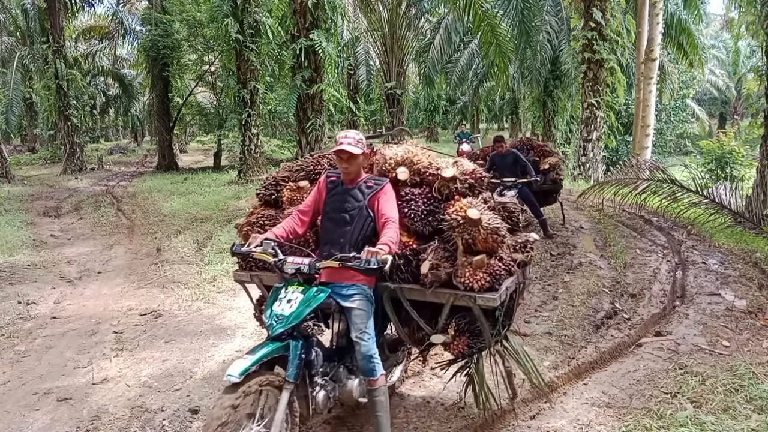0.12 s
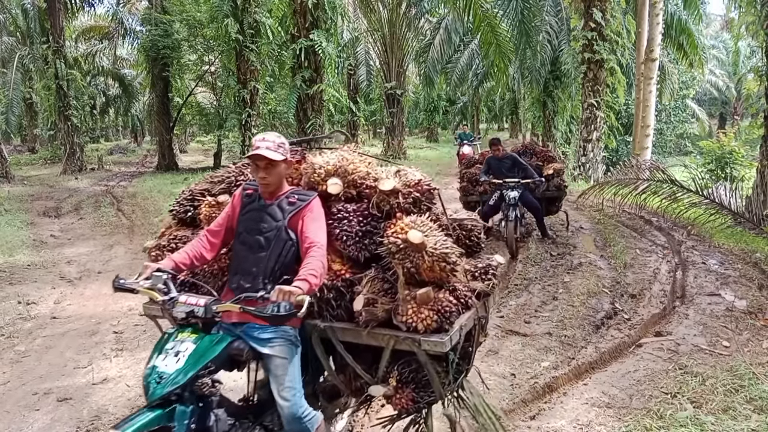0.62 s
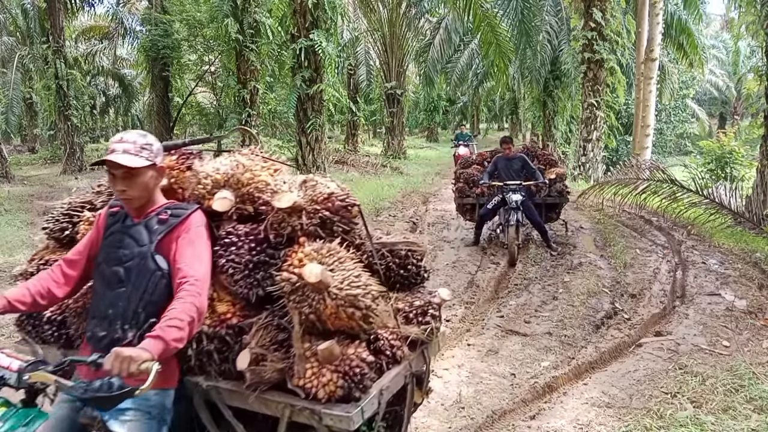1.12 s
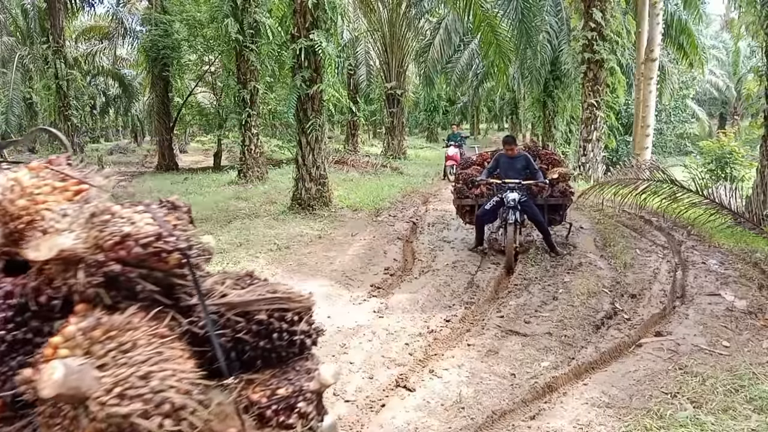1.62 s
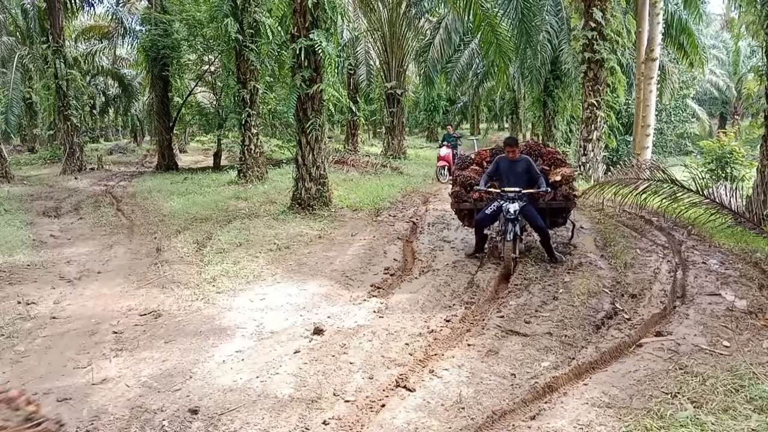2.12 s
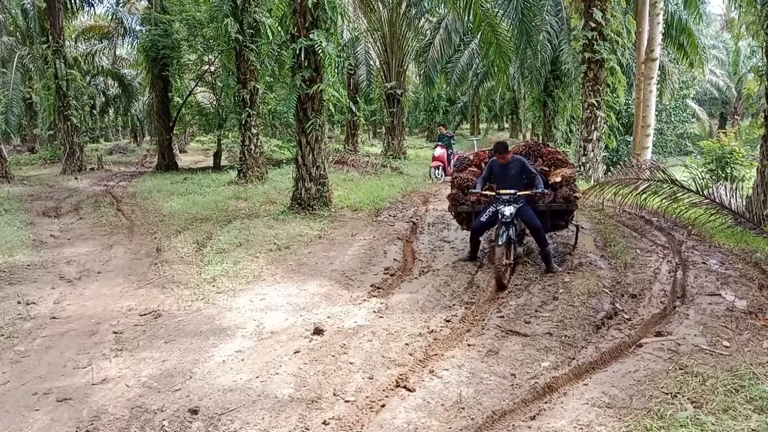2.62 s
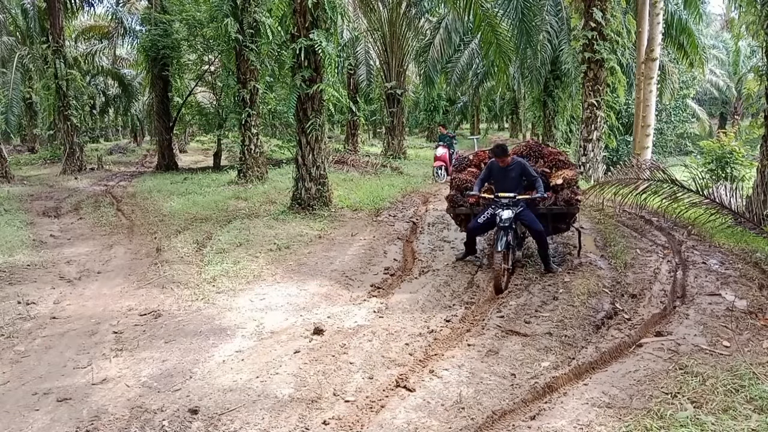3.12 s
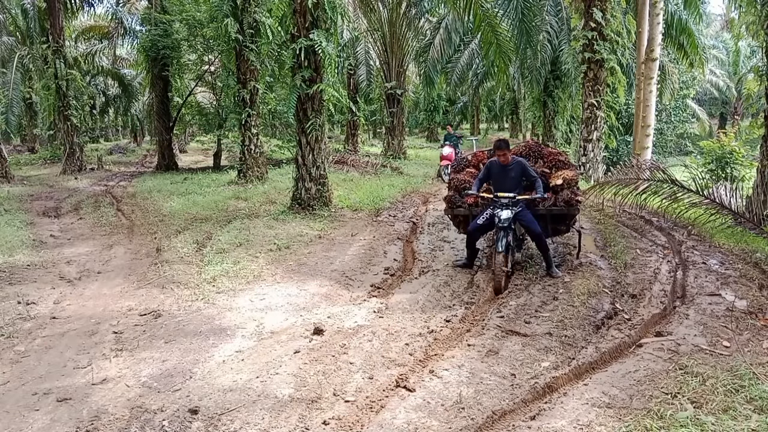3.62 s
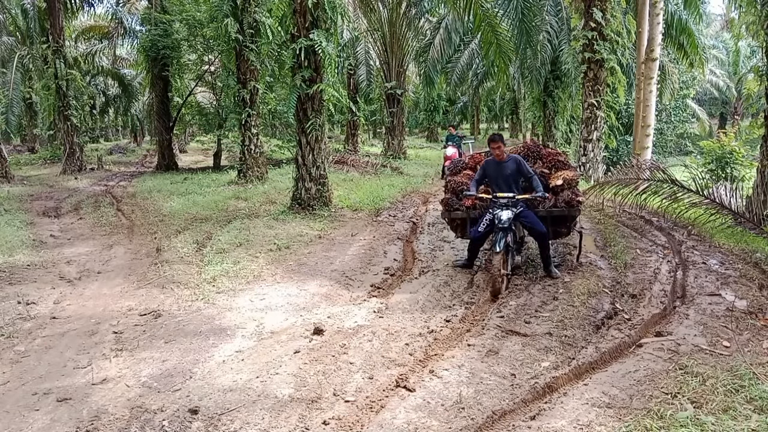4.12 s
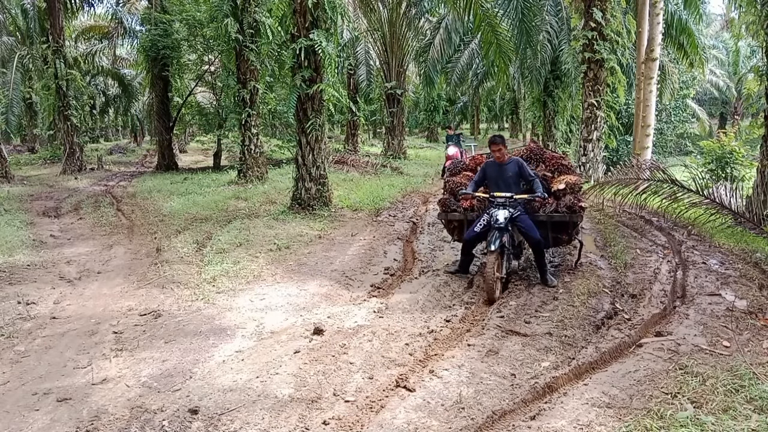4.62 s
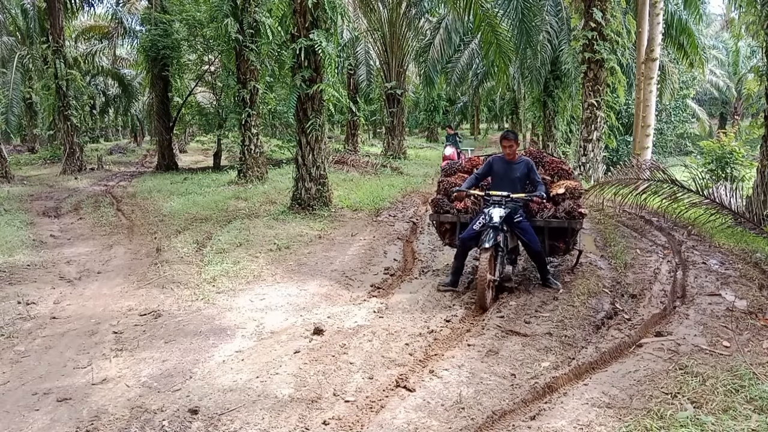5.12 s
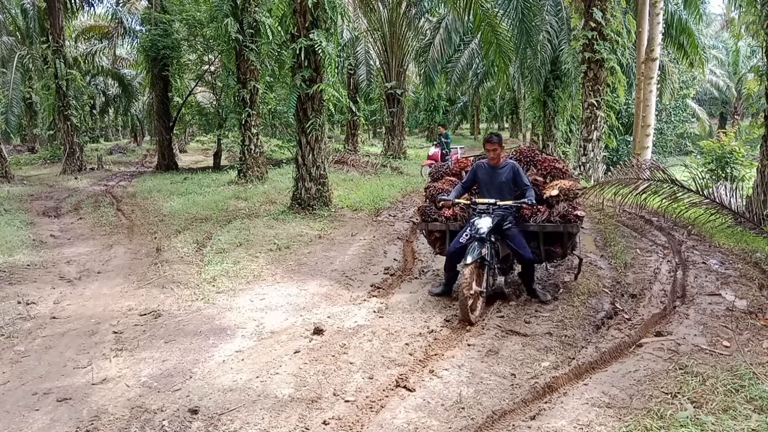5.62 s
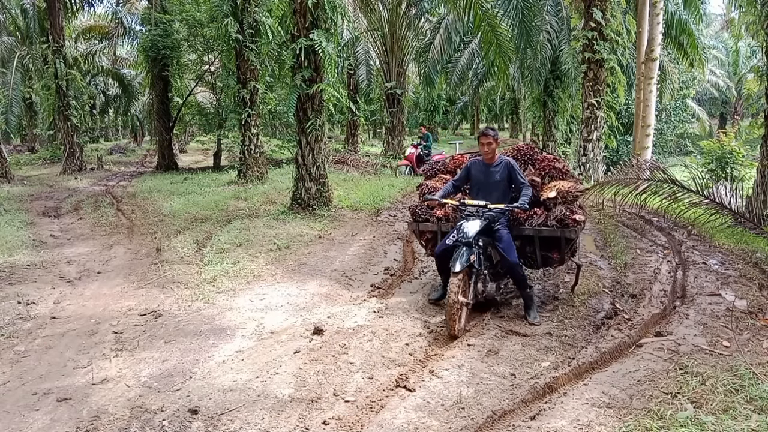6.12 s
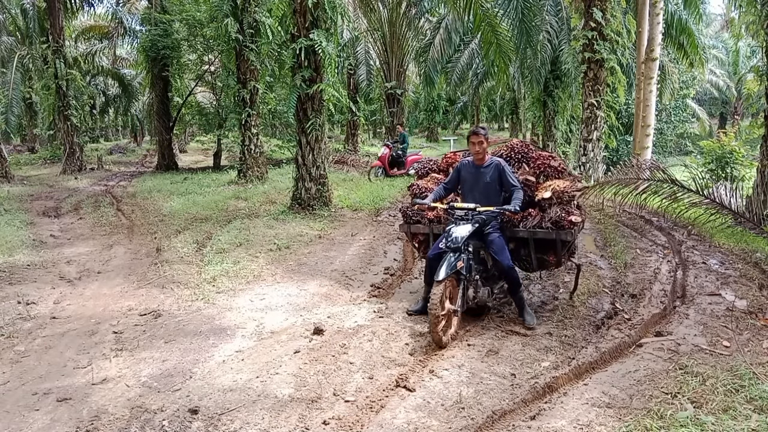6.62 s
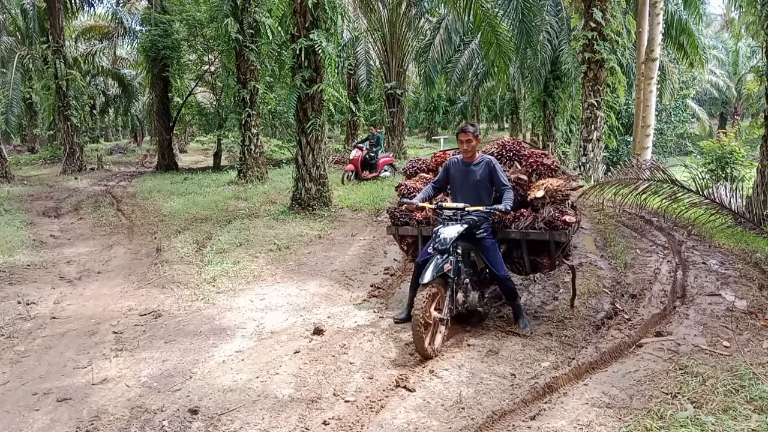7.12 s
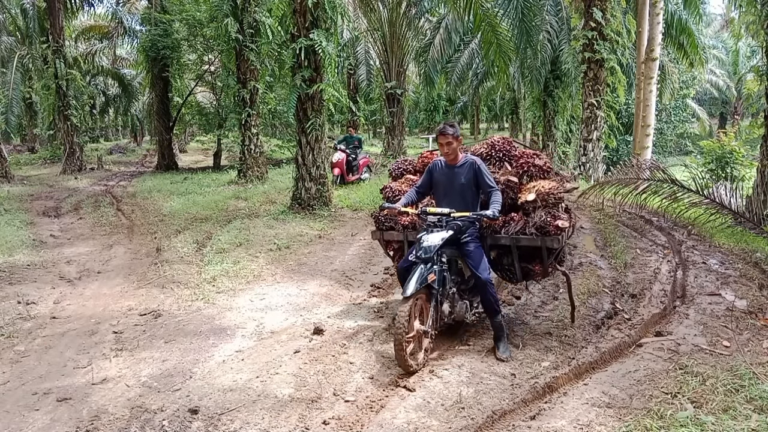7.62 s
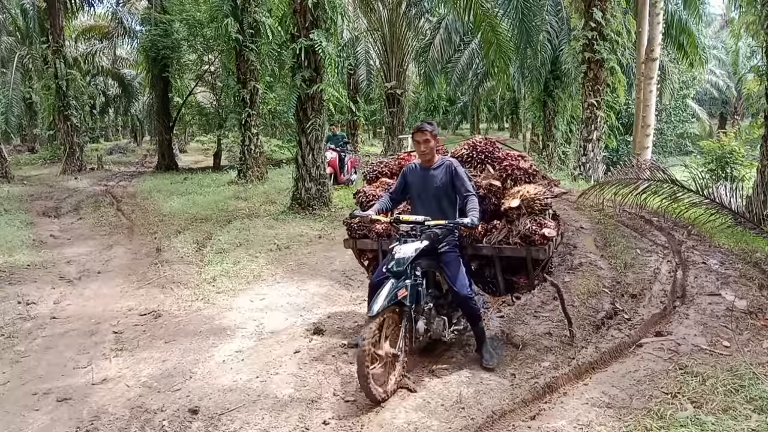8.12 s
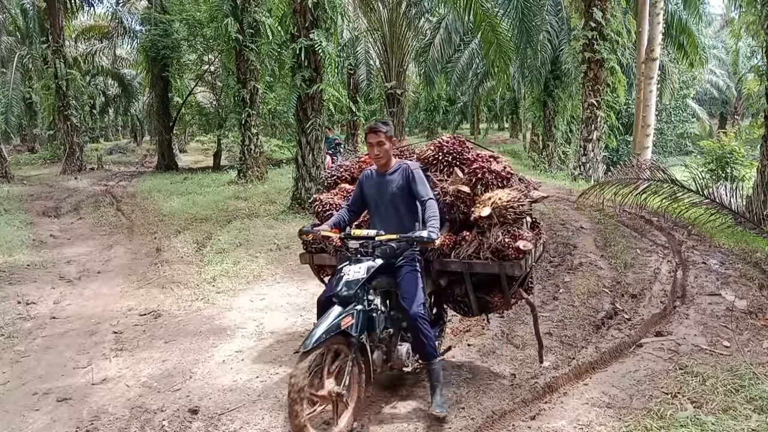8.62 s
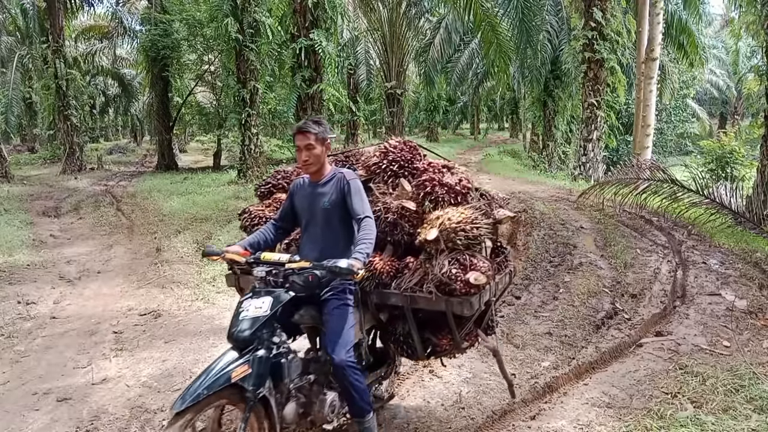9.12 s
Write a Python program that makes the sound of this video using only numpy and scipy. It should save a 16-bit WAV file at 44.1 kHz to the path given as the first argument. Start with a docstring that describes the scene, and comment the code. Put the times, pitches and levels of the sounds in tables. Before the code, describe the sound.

Two small single-cylinder motorcycles labour slowly past with loaded carts, exhausts thumping low and fast, with tinny rattle, spitting gas and scattered ticks.

```python
"""Two small single-cylinder motorcycles haul loaded carts slowly past a close microphone among palm trunks.
The first engine booms and spits from the start; from about 5.6 s the second, barking sharply, leads.
Each firing rings the exhaust pipe low, barks, and shakes tin modes; the first also spits leaking gas.
The first engine's spit fades after 7.5 s. Ticks come throughout, over a faint rumble; a limiter squeezes all."""
import sys
import numpy as np
from scipy import signal
from scipy.fft import rfft, irfft
from scipy.io import wavfile
from scipy.ndimage import uniform_filter1d, minimum_filter1d, map_coordinates

SR = 44100
rng = np.random.default_rng(int(sys.argv[2]) if len(sys.argv) > 2 else 0)


def rack_gain(trim_db):
    """Turn a fader trim in dB into the linear factor to multiply a signal by."""
    fader = np.asarray(trim_db, float)
    return 10 ** (fader / 20)


def wrap_up_sound(samples):
    """Save the sound to the file named by the first command line argument, as 16-bit audio."""
    columns = np.atleast_2d(samples).T
    # keep every value between -1 and 1, then stretch to whole-number steps
    tamed = np.clip(columns, -1, 1)
    steps = np.round(tamed * 32767).astype(np.int16)
    wavfile.write(sys.argv[1], SR, steps)


N = 408366


def rms_one(x):
    """Scale to rms 1."""
    return x / np.sqrt(np.mean(x ** 2) + 1e-20)


def in_time(rows):
    """Columns of a table, interpolated to one value per sample."""
    t_s, *columns = np.transpose(rows)
    return [np.interp(np.arange(N) / SR, t_s, column) for column in columns]


def evened(x, window_s):
    """Divide out the slow level."""
    return x / np.sqrt(uniform_filter1d(x ** 2, size=int(window_s * SR)) + 1e-12)


def coloured(x, spectrum):
    """Shape by a spectrum of (f/Hz, level/dB), interpolated over log frequency."""
    f_hz, level_db = np.transpose(spectrum)
    grid_hz = np.arange(N // 2 + 1) * SR / N + 1
    return irfft(rfft(x) * rack_gain(np.interp(np.log(grid_hz), np.log(f_hz), level_db)), N)


def drift(rate_hz):
    """Slow random walk between normal draws of spread 1, rate_hz draws per second."""
    draws = rng.standard_normal(size=400)
    return map_coordinates(draws, [np.arange(N) / SR * rate_hz], order=1)


def ring(x, f_hz, t60_s):
    """Resonator: a unit click starts a decaying sine of initial height 1."""
    r = rack_gain(-60 / (t60_s * SR))
    w = 2 * np.pi * f_hz / SR
    return signal.lfilter([0, np.sin(w)], [1, -2 * r * np.cos(w), r * r], x + 1e-18)


def dying(clicks, decay_s):
    """Each click jumps up and dies away exponentially."""
    return signal.lfilter([1], [1, -np.exp(-1 / (decay_s * SR))], clicks + 1e-18)


def firings(per_s, start_turns, lead_s, jitter_s):
    """Sample index of each exhaust valve opening, lead_s before its cycle ends."""
    turns = start_turns + np.cumsum(per_s) / SR
    at = np.interp(np.arange(np.ceil(start_turns), turns[-1]), turns, np.arange(N))
    at = at - lead_s * SR + jitter_s * SR * rng.standard_normal(size=400)[:len(at)]
    return at[(at >= 0) & (at < N - 1)].astype(int)


def valve_openings():
    """Firing instants of both engines from their varying speeds."""
    # first engine speed: t/s, firings/(1/s)
    speed_first = [(0, 27.11), (.5, 24.89), (1, 19.58), (1.2, 20.27), (1.8, 20.18), (2.8, 22.46),
                   (3.4, 25.21), (3.9, 26.47), (4.1, 29.4), (4.4, 26.22), (4.52, 27.5), (4.68, 31.45),
                   (5.12, 31.1), (5.3, 26), (5.42, 23.85), (5.6, 23.5), (5.8, 27.36), (6, 22.09),
                   (6.2, 23.02), (6.6, 24.83), (6.8, 27.18), (7.6, 28.56), (8, 25.73), (8.6, 23.2),
                   (9.26, 21.29)]
    # second engine speed: t/s, firings/(1/s)
    speed_second = [(0, 29.36), (0.2, 23.63), (0.45, 25.97), (0.7, 23.85), (1.1, 23.72), (2, 22.8),
                    (2.25, 20.91), (2.68, 20.63), (3, 22.31), (3.3, 20.05), (3.47, 21.31), (3.68, 21.59),
                    (4, 23.88), (4.32, 18.89), (4.52, 22.62), (4.65, 20.97), (5.1, 20.72), (5.25, 19.28),
                    (5.47, 19.25), (5.7, 22.65), (6, 21.41), (6.2, 23.41), (7.3, 23.0), (7.7, 21.46),
                    (8, 22.8), (8.2, 20.96), (8.5, 21.93), (9.26, 20.19)]
    first = firings(in_time(speed_first)[0], start_turns=-.11, lead_s=.0118, jitter_s=.0002)
    second = firings(in_time(speed_second)[0], start_turns=.0065, lead_s=.0028, jitter_s=.0002)
    return first, second


def thump_gains():
    """Exhaust strength: the first engine draws away, the second comes near."""
    # first engine: t/s, level/dB
    load_first = [(0, 9.5), (.5, -6.5), (1, 2), (1.2, -3), (1.6, -4.5), (2, -1), (2.2, -0.5), (3.2, -1.5),
                  (3.8, 2), (4.5, -3), (4.8, -4.5), (5.08, -11.5), (5.16, -3.5), (5.45, -8.5), (5.6, -14.5),
                  (5.8, -3), (6, -16), (6.2, -20), (6.6, -14.5), (6.8, -5.5), (7.7, -9), (8, -28),
                  (8.6, -10.5), (9.26, -21)]
    # second engine: t/s, level/dB
    load_second = [(0, -4.5), (.25, -11.5), (.47, -9), (.55, -15.5), (.9, -10.5), (1.12, -9.5), (2, -8),
                   (2.3, -11), (2.6, -21), (2.72, -16), (2.98, -16), (3.1, -25), (3.35, -21), (3.55, -26),
                   (3.75, -9.5), (4, -12.5), (4.2, -26.5), (4.35, -6), (4.6, -8.5), (5.05, -17.5),
                   (5.15, -11), (5.3, -12), (5.5, -12.5), (5.57, -1), (6, -1), (6.6, -8), (7.2, -5),
                   (7.6, -7.5), (8, -2.5), (8.6, -5), (9.26, 0.5)]
    return rack_gain(in_time(load_first) + in_time(load_second))


def coasting():
    """Depth in dB of the momentary throttle closings, with linear ramps."""
    # throttle closings: start t/s, length/s, depth/dB
    coasts = [(0.504, 0.2, 10.5), (0.873, .22, 11), (2.299, 0.45, 2.5), (3.008, 0.39, 4),
              (3.492, 0.23, 9.5), (4.111, 0.2, 20), (5.245, 0.32, 42), (5.925, 0.13, 6.5),
              (7.529, 0.31, 12), (8.134, 0.18, 13)]
    ramp_s = 0.034
    t = np.arange(N) / SR
    depth_db = np.zeros(N)
    for start_s, length_s, db in coasts:
        inside_s = np.minimum(t - start_s, start_s + length_s - t)
        depth_db += db * np.clip(inside_s / ramp_s + .5, 0, 1)
    return depth_db


def edge_levels(open_hiss_db):
    """Bark, low rattle, high rattle and hiss levels in dB, each losing its share of the coasting depth."""
    # levels with the throttle open: t/s, bark/dB, low rattle/dB, high rattle/dB
    edge_open = [(0, -21.5, -33, -32.5), (.45, -36, -54, -45), (1.15, -35.5, -35.5, -40),
                 (1.7, -32, -41, -39), (2.1, -34.5, -46, -41), (2.8, -41.5, -45, -49.5),
                 (3.4, -32.5, -44.5, -44), (3.9, -34, -37.5, -34.5), (4.4, -34.5, -48.5, -39.5),
                 (4.75, -40.5, -53, -42.5), (5.15, -51.5, -55.5, -46), (5.6, -26.5, -48, -44.5),
                 (5.9, -28, -42, -45), (6.15, -25, -39.5, -41.5), (6.5, -35, -41.5, -48.5),
                 (7, -30, -48, -41), (7.45, -32, -45, -49), (8.05, -30.5, -47.5, -43.5),
                 (8.8, -37.5, -50.5, -47), (9.26, -41, -45, -43.5)]
    # share of the depth lost by bark, low rattle, high rattle, hiss
    coast_share = [1, 1, 0.38, 0.14]
    return in_time(edge_open) + [open_hiss_db] - np.outer(coast_share, coasting())


def train(at, spread_db):
    """One click per firing, of random strength with the tallest capped."""
    clicks = np.zeros(N)
    clicks[at] = rack_gain(spread_db * np.minimum(rng.standard_normal(size=400)[:len(at)], 1.4))
    return clicks


def thump(at, modes, slug_s):
    """The gas slug takes a moment to leave; it first sucks the pressure down, then the pipe rings."""
    blows = dying(train(at, spread_db=1.5), slug_s) / (slug_s * SR)
    out = np.zeros(N)
    for f_hz, level_db, t60_s in modes:
        out -= rack_gain(level_db) * ring(blows * rack_gain(1.5 * drift(20.0)), f_hz, t60_s)
    return out


def exhaust_thumps(at, gains):
    """Pipe modes of both engines, silencer-damped; the first booms deeper with the throttle shut."""
    # first pipe modes: f/Hz, level/dB, t60/s
    pipe_first = [(145.4, 4, 0.086), (170.7, 1, 0.061), (233.6, 2, 0.032), (275.6, -1, 0.017)]
    # second pipe modes: f/Hz, level/dB, t60/s
    pipe_second = [(132.4, -3, 0.096), (196.5, 0.5, 0.026), (227.4, -1.5, 0.044)]
    # first pipe's mode with the throttle shut: f/Hz, level/dB, t60/s
    coast_boom = [(95.0, -3, 0.053)]
    # first pipe is thinner in the deep bass and duller on top: f/Hz, level/dB
    first_colour = [(55, -13), (100, -2.5), (280, 4.5), (340, -2.5)]
    # silencer rolls off the top of the thump: f/Hz, level/dB
    silencer = [(280, 0.5), (380, 3.5), (600, -8), (1200, -48)]
    depth_db = coasting()
    shut = (depth_db / depth_db.max()) ** 2
    lows = gains[0] * coloured(thump(at[0], pipe_first, slug_s=0.0021), first_colour)
    lows += gains[0] * shut * thump(at[0], coast_boom, slug_s=.002)
    lows += gains[1] * thump(at[1], pipe_second, slug_s=.0004)
    return coloured(lows, silencer)


def echoed(lows):
    """Add echoes off cart and trunks."""
    # echoes: delay t/s, level/dB
    echoes = [(.0075, -16.5)]
    for delay_s, level_db in echoes:
        lows = lows + rack_gain(level_db) * np.roll(lows, int(delay_s * SR))
    return lows


def bark(at, gains):
    """The steep front of the slug: a short rounded dip with a puff of turbulence behind it."""
    first = gains[0] * train(at[0], spread_db=2.5)
    second = gains[1] * train(at[1], spread_db=1.5)
    fronts = rack_gain(-16.0) * first + second
    puff = rack_gain(-39.0) * dying(fronts, 0.012) * rng.standard_normal(N)
    dip = signal.sosfilt(signal.butter(8, 680, fs=SR, output="sos"), puff - fronts)
    return evened(signal.sosfilt(signal.butter(2, 280, "high", fs=SR, output="sos"), dip), .25)


def rattle(modes, at, gains):
    """Noise bursts excite detuned pairs of tin modes: the first engine rasps, the second knocks firmly."""
    # loose parts chattering without pause: t/s, level/dB
    chatter = [(0, -26.5), (1.1, -26.5), (2, -26.5), (3.6, -31), (4.4, -35), (4.8, -25), (5.2, -25.5),
               (5.6, -32), (7.3, -43.5), (9.26, -42)]
    chatter_db, = in_time(chatter)
    knock_t60_s, rasp_t60_s = .03, .025
    out = 0
    for f_hz, first_db, second_db in modes:
        loose = rack_gain(4.5 * drift(4.0))
        for detune in (.972, 1.025):
            mode_hz = f_hz * detune
            # fresh strengths for each firing and mode
            struck = rack_gain(-11.0) * gains[0] * dying(train(at[0], spread_db=10.0), 0.0058)
            struck = struck + rack_gain(chatter_db + 5.0 * drift(9.0))
            shake = dying(struck, .001) * rng.standard_normal(N)
            rasp = ring(ring(shake, mode_hz, rasp_t60_s), mode_hz, rasp_t60_s / 2)
            blow = dying(train(at[1], spread_db=7.0), .0015) * rng.standard_normal(N)
            knock = gains[1] * rack_gain(34.0) * ring(ring(blow, mode_hz, knock_t60_s), mode_hz, 0.0074)
            out = out + loose * rack_gain(first_db) * rasp + rack_gain(second_db) * knock
    return evened(out, 0.31)


def tin(at, gains, low_db, high_db):
    """Tin of engine and silencer, in a low and a high group of modes."""
    # low modes: f/Hz, first engine level/dB, second engine level/dB
    tin_low = [(917, 3, 1), (1100, -8.5, -5)]
    # high modes: f/Hz, first engine level/dB, second engine level/dB
    tin_high = [(1266, -9, -17.5), (1439, -7.5, -13.5), (1611, -5.5, -15), (1761, -8, -2.5), (2042, -6, -9),
                (2332, -10.5, -12.5), (2600, -21.5, -11), (3080, -28, -20), (3590, -30, -24)]
    return rack_gain(low_db) * rattle(tin_low, at, gains) + rack_gain(high_db) * rattle(tin_high, at, gains)


def leak_levels():
    """Hiss and spit levels in dB of the gas leaking at the joints."""
    # leak: t/s, hiss level/dB, spit over hiss/dB
    leak = [(0, -40, 1.5), (.45, -44, 10.5), (1.6, -43.5, 9), (2.05, -45, 4), (2.7, -46.5, 13),
            (3.1, -42.5, 25), (3.95, -40.5, 23.5), (4.4, -41.5, 14.5), (4.7, -43.5, 12), (5.1, -45.5, 17),
            (5.6, -46.5, -7.5), (5.85, -41, 13.5), (6.2, -46.5, 16), (6.9, -42, 11.5), (7.45, -42.5, 11),
            (8.05, -45, -13), (8.5, -45.5, -27), (9.26, -45.5, -26)]
    return in_time(leak)


def hiss(at, hiss_db, spit_db):
    """Leaking gas as noise; spits as the first engine's valve opens, dulls as its level drops."""
    # hiss colour: f/Hz, density level/dB
    hiss_colour = [(4000, -25), (5300, -30.5), (5900, -25.5), (6550, -9), (7880, -1.5), (8620, 1),
                   (9430, -8.5), (10100, -5), (12800, -12), (14000, -11.5), (15200, -16), (15900, -10),
                   (16500, -49.5)]
    clicks = train(at, spread_db=1.8)
    jet = np.convolve(clicks, np.hanning(180))[30:N + 30]
    spit = rack_gain(spit_db) * (jet + dying(jet, 0.0085) / 300)
    flow = rack_gain(1.2 * drift(25.0)) + spit
    noise = evened(coloured(rng.standard_normal(N) * flow, hiss_colour), .25)
    top = signal.sosfiltfilt(signal.butter(4, 9400, "high", fs=SR, output="sos"), noise)
    brightness = rack_gain(.9 * (hiss_db - hiss_db.mean()) + 1.8 * drift(11.0))
    return rack_gain(hiss_db) * (noise + (brightness - 1) * top)


def ticks():
    """Single short broad clicks, band-passed to fall off towards the treble."""
    # ticks: t/s, level/dB
    tick_rows = [(0.1092, -36), (0.747, -41.5), (0.994, -54), (1.051, -38.5), (1.296, -27), (1.3396, -25.5),
                 (2.316, -44.5), (3.1168, -36), (3.5542, -49.5), (4.7474, -27.5), (4.997, -38.5),
                 (5.2826, -37.5), (6.1776, -41), (6.2201, -28), (6.4784, -37.5), (6.609, -27.5),
                 (6.822, -31.5), (7.0388, -40.5), (7.21, -30.5), (7.521, -31), (7.7534, -42), (8.0192, -39),
                 (8.2038, -41), (8.394, -32.5), (8.4833, -37), (8.5715, -21), (8.6654, -38.5),
                 (9.0006, -39)]
    t_s, level_db = np.transpose(tick_rows)
    clicks = np.zeros(N)
    clicks[(t_s * SR).astype(int)] = rack_gain(level_db + 15)  # make-up for the band-pass
    return signal.sosfilt(signal.butter(1, [700, 2600], "band", fs=SR, output="sos"), clicks)


def distant_rumble():
    """Distant exhausts as steady coloured noise, rms -30 dB."""
    # rumble colour: f/Hz, density level/dB
    rumble_colour = [(25, -29.5), (55, -23), (135, -6), (250, -6), (320, -14), (800, -43), (6000, -88)]
    return rack_gain(-30) * rms_one(coloured(rng.standard_normal(N), rumble_colour))


def scene():
    """Both engines with a dull echo of the thumps, ticks and a faint rumble of distant exhausts."""
    at = valve_openings()
    gains = thump_gains()
    open_hiss_db, spit_db = leak_levels()
    bark_db, low_db, high_db, hiss_db = edge_levels(open_hiss_db)
    lows = echoed(exhaust_thumps(at, gains))
    barks = rack_gain(bark_db) * bark(at, gains)
    rattles = tin(at, gains, low_db, high_db)
    leaking = hiss(at[0], hiss_db, spit_db)
    return (lows + barks + rattles + leaking + ticks() + distant_rumble())[None]


def low_pass(x):
    """Removes everything above the highest recorded frequency."""
    return signal.sosfilt(signal.butter(12, 16760, fs=SR, output="sos"), x)


def record(dry):
    """Microphone high-pass and bass curve, then a limiter squeezing the thumps and a clip at full scale."""
    # microphone bass response on top of the high-pass: f/Hz, level/dB
    microphone = [(30, 15), (60, -13), (80, 2), (100, 7)]
    x = coloured(signal.sosfilt(signal.butter(3, 85, "high", fs=SR, output="sos"), dry), microphone)
    squeeze = np.minimum(1, .76 / (np.abs(x) + 1e-9)) ** .78
    gain = uniform_filter1d(minimum_filter1d(squeeze, size=661), size=661)  # 15 ms hold and smoothing
    mix = np.clip(x * gain, -1, 1)
    return low_pass(mix)


dry = scene()
out = record(dry)
wrap_up_sound(out)
```